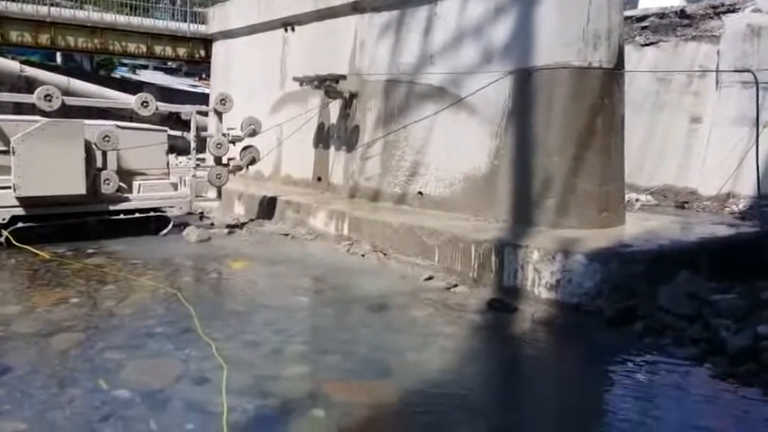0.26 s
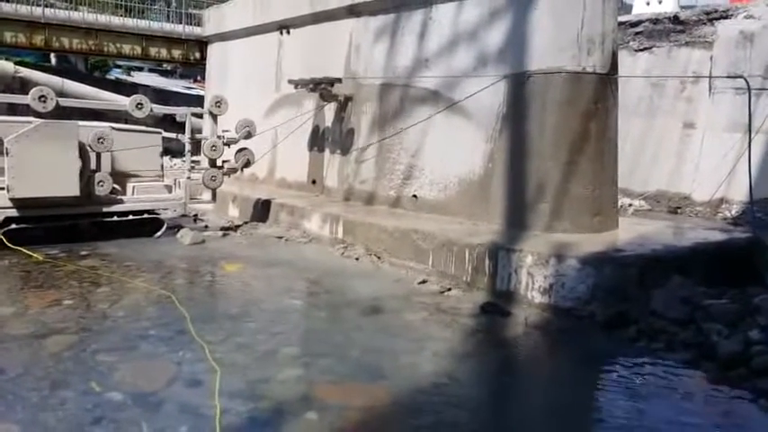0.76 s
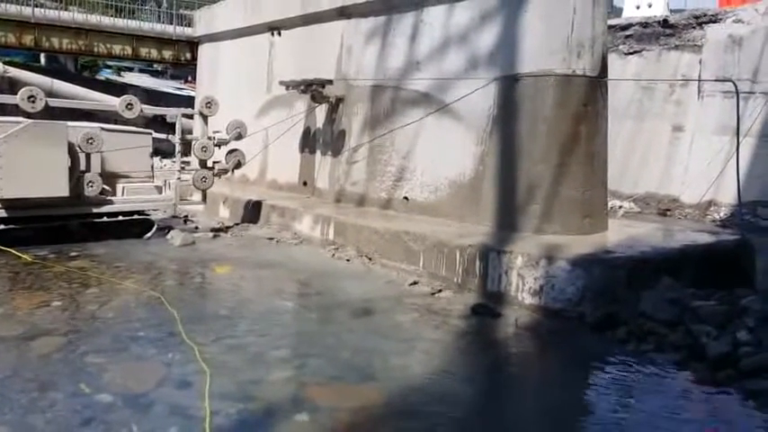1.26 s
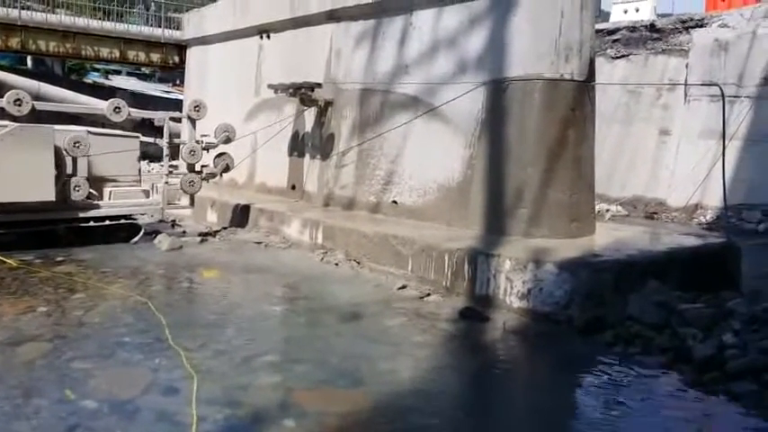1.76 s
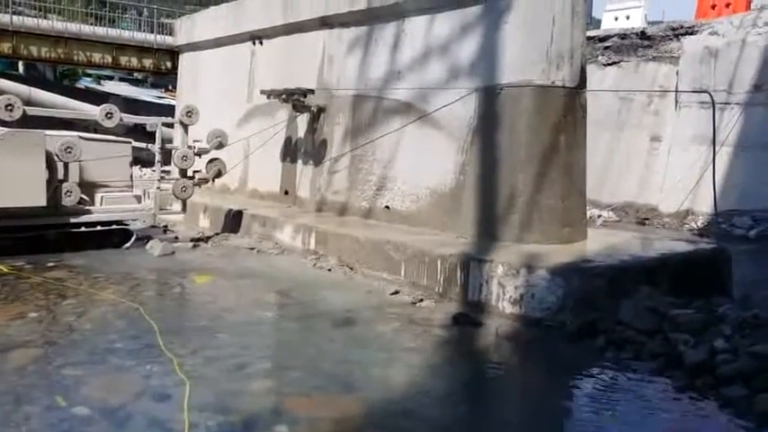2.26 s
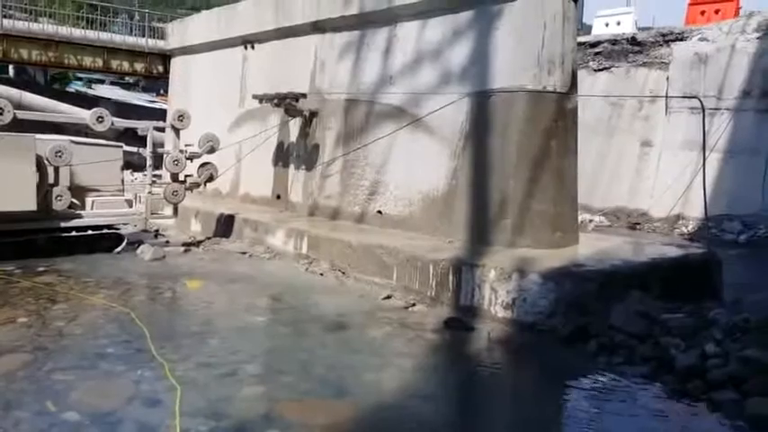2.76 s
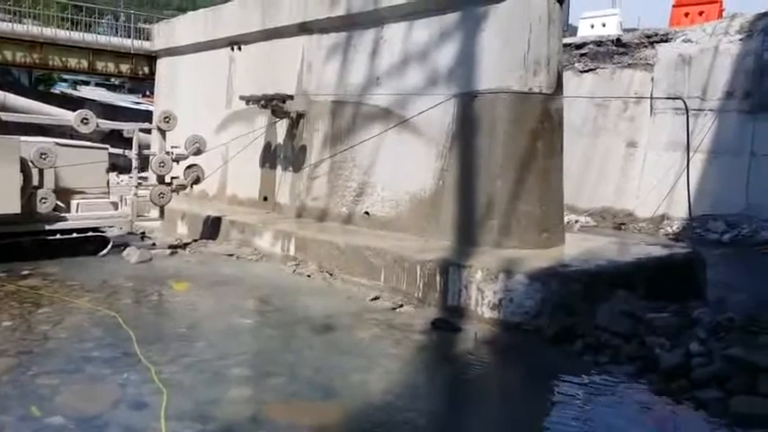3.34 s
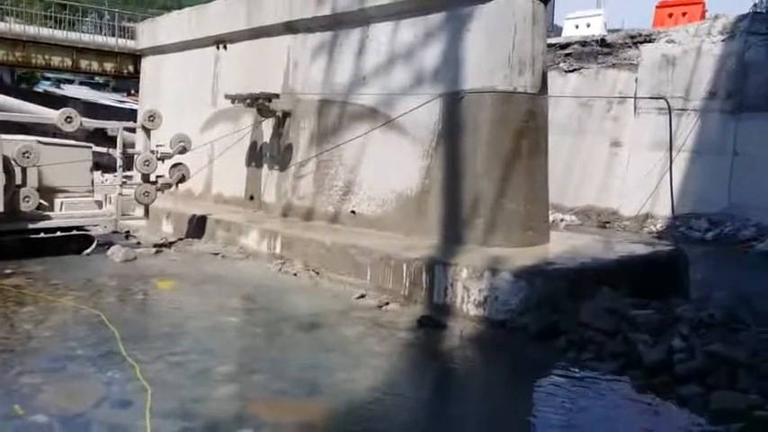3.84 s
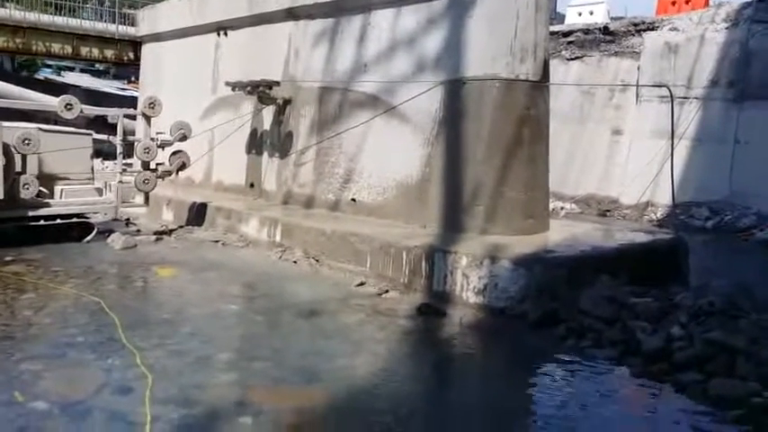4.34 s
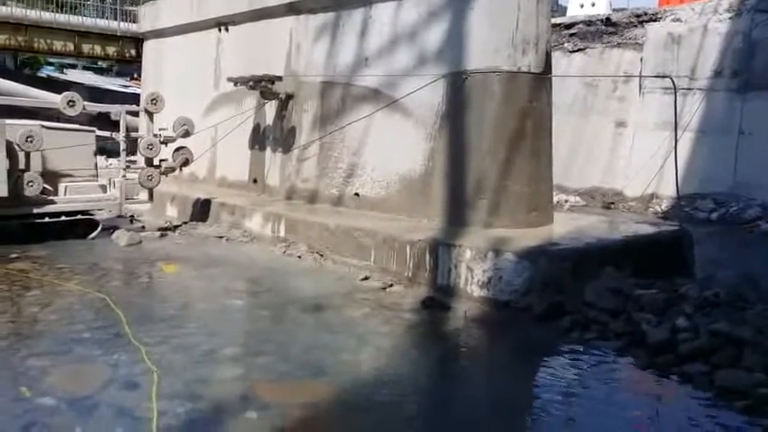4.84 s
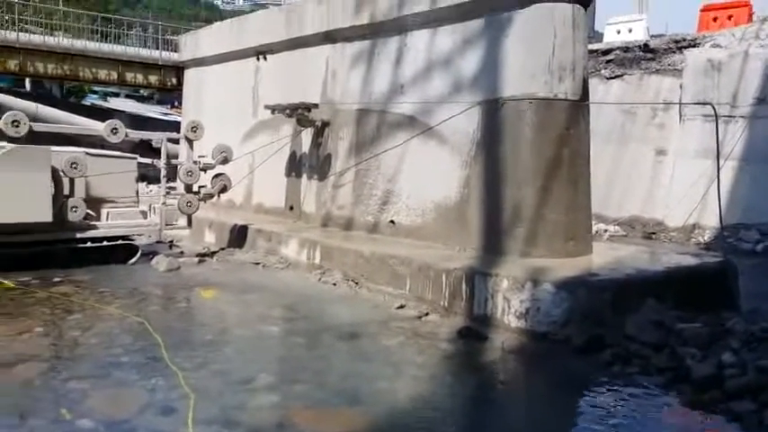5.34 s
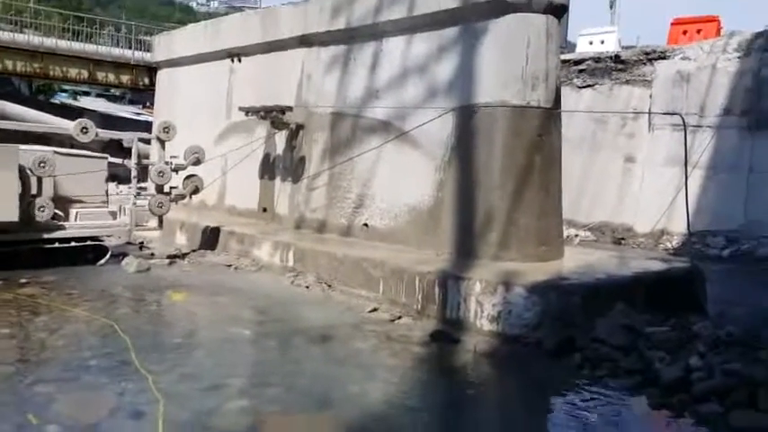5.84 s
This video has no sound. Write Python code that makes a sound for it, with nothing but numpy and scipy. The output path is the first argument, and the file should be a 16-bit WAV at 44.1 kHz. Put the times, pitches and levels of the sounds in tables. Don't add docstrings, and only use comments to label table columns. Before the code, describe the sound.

Loud constant engine roar, buzzing pump and motor whine under a gritty stone-cutting hiss, one short chirp, then the right channel dulls abruptly.

```python
import sys
import numpy as np
from scipy import signal
from scipy.io import wavfile
from scipy.ndimage import uniform_filter1d

SR = 44100
rng = np.random.default_rng(int(sys.argv[2]) if len(sys.argv) > 2 else 0)


def transcribe(u):
    v = np.clip(np.atleast_2d(u).T, -1, 1)
    q = np.round(v * 32767).astype(np.int16)
    wavfile.write(sys.argv[1], SR, q)


def gain_from_db(level_db):
    decades = np.asarray(level_db, float) / 20
    return 10 ** decades


N = 268128


def read(points, hz):
    f, value = np.transpose(points)
    return np.interp(np.log(hz + 1), np.log(f + 1), value)


def follow(rows, t):
    s, *columns = np.transpose(rows)
    return [np.interp(t, s, c) for c in columns]


def drift(t, top_hz):
    x = 0
    for f in np.geomspace(top_hz / 20, top_hz, 20):
        x = x + np.sin(2 * np.pi * (f * t + rng.random())) / np.sqrt(f)
    return x / x.std()


# (frequency [Hz], left port's lead [rad])
LEAD = [(0, 0), (900, .65), (1250, 2.2), (1600, 3), (1930, 3.6), (2280, 6.2), (2620, 6.7), (3000, 10),
        (6400, 11.6), (7500, 9.4), (10000, 9)]


def lead(hz):
    return np.interp(hz, *np.transpose(LEAD))


def tone(turns, hz, left_db, right_db):
    lag = np.array([[0], [lead(hz)]])
    wave = np.cos(2 * np.pi * (turns + rng.random()) - lag)
    return np.sqrt(2) * gain_from_db(np.array([left_db, right_db])) * wave


def lumps(hz, t):
    patch = rng.standard_normal((len(hz), len(t)))
    patch = uniform_filter1d(uniform_filter1d(patch, size=30, axis=0), size=7, axis=1)
    return patch / patch.std()


# (frequency [Hz], width [Hz], level [dB])
CASING = [(237, 21, 2), (293.6, 14, 3), (442, 15.5, 7.5), (169.5, 9.7, 6.5), (1120, 48, 1), (2230, 32, 6),
          (2406, 44, 7), (2424, 29, 0), (7440, 140, 1), (6700, 180, 0), (5400, 180, -2.5)]
# (frequency [Hz], left-right likeness [0-1])
SAME = [(30, 0.3), (86, 0.9), (387, 0.99), (516, 0.69), (775, 0.97), (2110, 0.082), (2368, 0.5),
        (2756, 0.057), (4134, 0.32), (4349, 0.14), (6330, 0.13), (6976, 0.072), (7536, 0.37), (7838, 0.049),
        (9991, 0.075)]


def diffuse_field(hz, band, left_db, right_db, swell_db):
    a, b, c, d = rng.standard_normal((4, *swell_db.shape))
    same = np.clip(read(SAME, hz), 0, 1)[:, None]
    left = a + 1j * b
    right = same * left + np.sqrt(1 - same ** 2) * (c + 1j * d)
    right = right * np.exp(-1j * lead(hz))[:, None]
    ring_db = sum(db / (1 + (2 * (hz - f) / width) ** 2) for f, width, db in CASING)
    ports_db = np.array([left_db, right_db]) + ring_db
    level = gain_from_db(ports_db[:, :, None] + swell_db + 16.5) * band[:, None]
    return signal.istft(np.array([left, right]) * level, nperseg=1024, noverlap=768)[1][:, :N]


# (frequency [Hz], level [dB per Hz])
ROAR_LEFT = [(32, -72), (43, -83), (96, -64), (129, -49.5), (172, -49), (236, -45.5), (366, -45.5),
             (506, -57), (624, -48.5), (764, -45.5), (861, -53), (1001, -58.5), (1200, -54)]
ROAR_RIGHT = [(32, -69), (43, -84), (53, -61.4), (86, -62.5), (118, -48), (172, -48), (247, -43.5),
              (376, -45), (516, -55), (645, -46.5), (732, -49.5), (1108, -50.5), (1291, -54)]


def engine_roar(hz, t):
    wander_db = -0.14 + 1.0 * drift(t, 4.3)
    swell_db = wander_db * (hz < 360)[:, None] + 0.88 * lumps(hz, t)
    return diffuse_field(hz, hz < 1310, read(ROAR_LEFT, hz), read(ROAR_RIGHT, hz), swell_db)


# (time [s], level [dB])
SNAGS = [(.15, 1), (.75, 0.5), (1.18, 1.2), (1.32, -0.7), (1.6, 0.5), (1.82, 1), (2.12, 1.2), (2.28, 1.5),
         (2.85, -0.3), (3.28, 1), (3.78, 1), (3.92, 0.7), (4.2, 0.7), (4.62, -0.5), (4.88, 1), (5.5, -1.5),
         (5.7, 0.5), (6, 0.7)]


def bite(t):
    snag_s = 0.052
    snags_db = sum(db * np.exp(-.5 * ((t - s) / snag_s) ** 2) for s, db in SNAGS)
    return 0.5 + 0.2 * drift(t, 3.3) + snags_db


# (frequency [Hz], level [dB per Hz])
HISS_LEFT = [(1400, -58.5), (1636, -54.5), (2067, -59.5), (2411, -61), (2971, -60.5), (3660, -61.5),
             (4134, -58), (5211, -59), (6933, -54), (7192, -52.5), (8742, -61.5), (11000, -66.5),
             (14400, -80.5)]
HISS_RIGHT = [(1335, -54.5), (2067, -56), (2325, -55), (3316, -57.5), (5598, -52.5), (7407, -63),
              (8484, -64.5), (9500, -69.5), (11500, -77), (14400, -88)]


def grinding_hiss(hz, t):
    grind = np.clip(np.log2(hz / 1300 + 1e-9) / 1.1, 0, 1)[:, None]
    flutter_db = 1.0 * lumps(hz, t) + 0.42 * drift(t, 60)
    swell_db = grind * (bite(t) + flutter_db)
    return diffuse_field(hz, hz >= 1310, read(HISS_LEFT, hz), read(HISS_RIGHT, hz), swell_db)


SHAFT_HZ, PISTONS = 35.44, 9
# (multiple of shaft rate, level [dB])
ENGINE = [(2, -75), (3, -49), (4, -39), (5, -37.5), (6, -35.5), (7, -30.5), (8, -74)]
# (multiple of piston rate, left level [dB], right level [dB])
PUMP = [(1, -34.8, -33.5), (2, -41.3, -35.1), (3, -43.5, -39.5), (4, -38.8, -34.1), (5, -35.5, -44),
        (6, -41.5, -39), (7, -48.3, -41.0), (8, -44.5, -39.7), (9, -49, -36), (10, -50.7, -43.4)]


def power_pack(t):
    turns = np.cumsum(SHAFT_HZ * (1 + .0005 * drift(t, 3))) / SR
    coarse = t[::256]

    def waver():
        return np.interp(t, coarse, 2.0 * drift(coarse, 2) - .8)

    out = 0
    for k, db in ENGINE:
        out = out + tone(k * turns, k * SHAFT_HZ, db + waver(), db + waver())
    for k, left_db, right_db in PUMP:
        order = PISTONS * k
        out = out + tone(order * turns, order * SHAFT_HZ, left_db + waver(), right_db + waver())
    return out


# (time [s], pitch [Hz], level [dB], second harmonic level [dB])
WHINE = [(0, 373.7, -16.5, -21.5), (0.45, 374.6, -21.5, -21.5), (0.8, 376.2, -18.5, -21.5),
         (1.7, 376.9, -18.5, -20.5), (2.15, 374.9, -17.5, -21.5), (2.6, 376.6, -18.5, -19.5),
         (3.3, 377.3, -18, -22), (3.95, 376, -17.2, -20), (4.2, 375.3, -17.5, -21),
         (4.75, 378.5, -18.5, -20.5), (5.4, 376.6, -19, -22.5), (5.65, 376.8, -17, -22.5),
         (6.08, 376.4, -16.5, -19.5)]
# (left level [dB], right level [dB])
WHINE_PAN = [
    (-1.75, 2),
    (0.2, 0),
]


def drive_motor(t):
    hz, *levels_db = follow(WHINE, t)
    turns = np.cumsum(hz) / SR
    out = 0
    for k, (db, (left_db, right_db)) in enumerate(zip(levels_db, WHINE_PAN), start=1):
        out = out + tone(k * turns, k * hz.mean(), db + left_db, db + right_db)
    return out


# (start [s], end [s], frequency [Hz], level [dB])
SQUEAK = (5.33, 5.39, 1790, -28)


def squeak(t):
    start, end, hz, db = SQUEAK
    gate = np.clip(np.minimum(t - start, end - t) / 0.011, 0, 1)
    return gain_from_db(db) * gate * np.sin(2 * np.pi * hz * t)


def finger(t):
    near_s, cupped_s, seal_s, snap_s = 4.6, 5.15, 5.506, .016
    after = np.maximum(t - seal_s, 0)
    cup = np.clip((t - near_s) / (cupped_s - near_s), 0, 1) ** .7
    seal = .9 * (1 - np.exp(-after / snap_s)) + .35 * after
    return cup * np.exp(-2 * after / snap_s), seal


# (time [s], share turned)
TURN = [
    (5.15, 0),
    (5.49, -.3),
    (5.58, -.2),
    (5.9, 1),
    (6.08, .9),
]
# (frequency [Hz], level change [dB])
CUPPED = [(1033, -0.7), (3359, -1), (4995, 4), (6201, 3), (6804, 6), (7321, 4.5), (9991, 0)]
SEALED = [(215, -1.9), (1464, -5.0), (3273, -14.2), (4651, -26.4), (6287, -27.0), (7493, -22.1),
          (9000, -20)]
TURNED = [(1033, -0.3), (2411, -0.5), (4823, 1.7), (5598, 4.5), (8010, -0.5), (9991, 0.5), (10938, -0.2)]


def hand_on_phone(dry):
    cavity_hz = 700
    hz, t, z = signal.stft(dry, SR, nperseg=256, noverlap=192)
    cup, seal = finger(t)
    turn = follow(TURN, t)[0]
    left = gain_from_db(np.outer(read(TURNED, hz), turn))
    right = gain_from_db(np.outer(read(CUPPED, hz), cup) + np.outer(read(SEALED, hz), seal))
    right = right * np.exp(-1j * np.outer(np.arctan(hz / cavity_hz), seal))
    return signal.istft(z * [left, right], SR, nperseg=256, noverlap=192)[1][:, :N]


# (time [s], frequency [Hz], peak [dB], t60 [s])
SEAL_POP = (5.553, 3100, -10, .008)


def seal_pop(t):
    s, hz, db, t60 = SEAL_POP
    after = np.maximum(t - s, 0)
    return gain_from_db(db - 60 * after / t60) * np.sin(2 * np.pi * hz * after) * [[0], [1]]


# (time [s], drop of the threshold [dB])
SPARE = [
    (5.55, 0),
    (5.68, 7),
    (5.8, 10),
    (5.88, 0),
    (6.03, 0),
    (6.08, 9),
]


def thin_treble(x):
    hz, t, z = signal.stft(x, SR, "cosine", nperseg=2048, noverlap=1024, boundary="even", padded=False)
    power_db = 10 * np.log10(abs(z) ** 2 + 1e-20)
    hiss_db = power_db[:, (hz > 3000) & (hz < 8000)].mean(axis=1, keepdims=True)
    luck_db = 2.3 * np.repeat(rng.standard_normal((2, 65, len(t))), 16, axis=1)[:, :len(hz)]
    spare_db = follow(SPARE, t)[0] * np.array([1, 0])[:, None, None]
    step = gain_from_db(-48.9 + .68 * (hiss_db + 48) + luck_db + .6 * drift(t, 16) - spare_db)
    rounded = step * np.floor(abs(z) / step + .4) / (abs(z) + 1e-12)
    kept = np.where((hz < 4000)[:, None], 1, rounded)
    return signal.istft(z * kept, SR, "cosine", nperseg=2048, noverlap=1024)[1][:, :N]


def scene():
    t = np.arange(N) / SR
    hz = np.fft.rfftfreq(1024, 1 / SR)
    frame_t = np.arange(N // 256 + 5) * 256 / SR
    wash = engine_roar(hz, frame_t) + grinding_hiss(hz, frame_t)
    return wash + power_pack(t) + drive_motor(t) + squeak(t)


def roll_off(x):
    return signal.sosfilt(signal.butter(12, 14420, fs=SR, output="sos"), x)


def record(dry):
    held = hand_on_phone(dry) + seal_pop(np.arange(N) / SR)
    held = held / (1 + held ** 6) ** (1 / 6)
    mix = thin_treble(np.pad(held, ((0, 0), (0, 2048)), "reflect"))
    return roll_off(mix)


dry = scene()
out = record(dry)
transcribe(out)
```